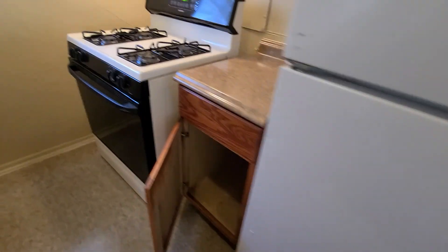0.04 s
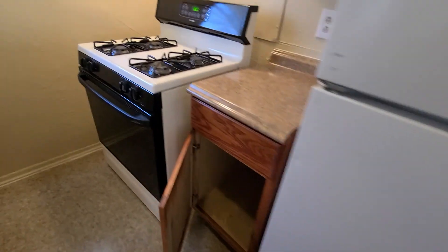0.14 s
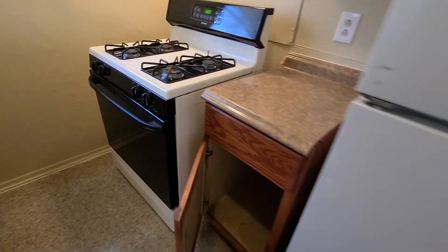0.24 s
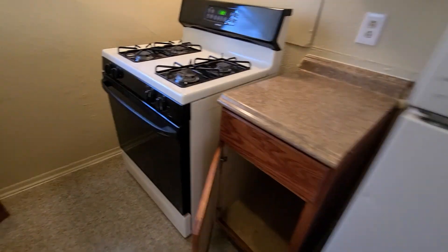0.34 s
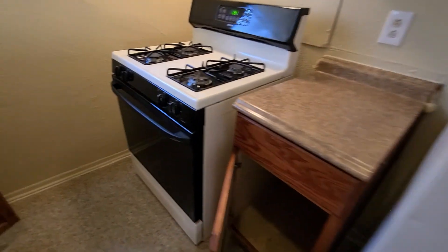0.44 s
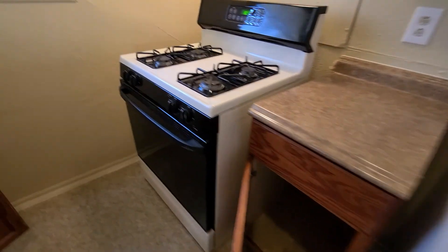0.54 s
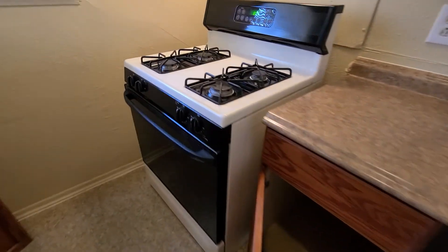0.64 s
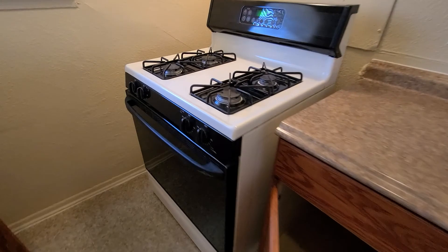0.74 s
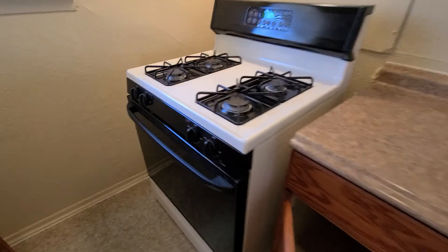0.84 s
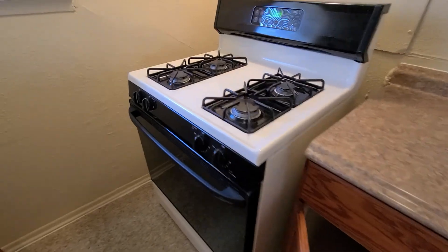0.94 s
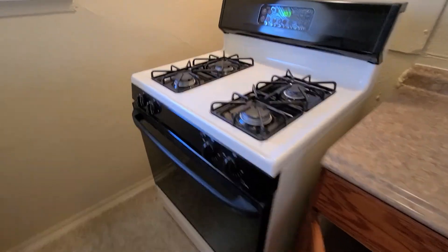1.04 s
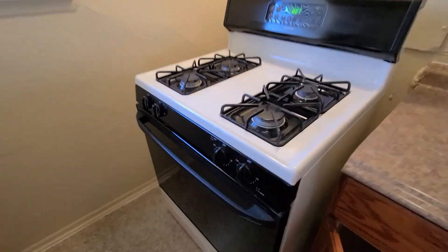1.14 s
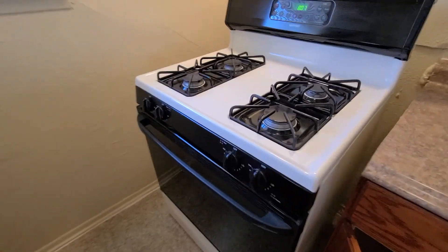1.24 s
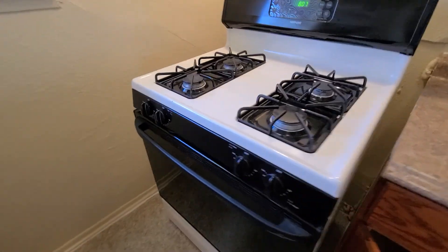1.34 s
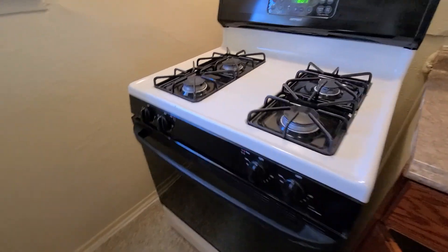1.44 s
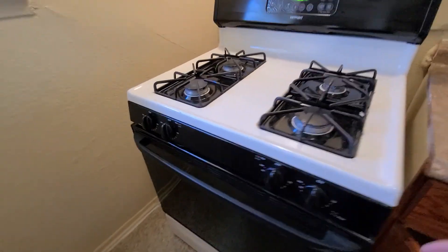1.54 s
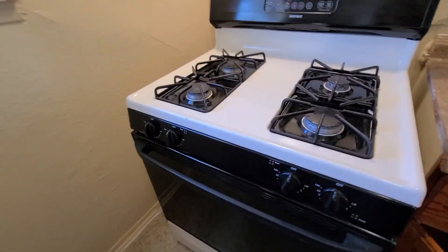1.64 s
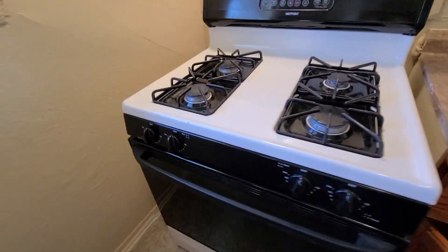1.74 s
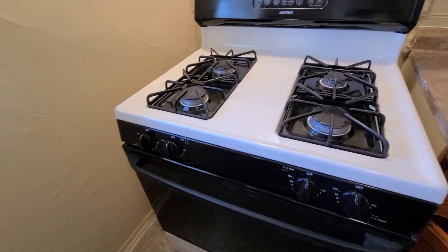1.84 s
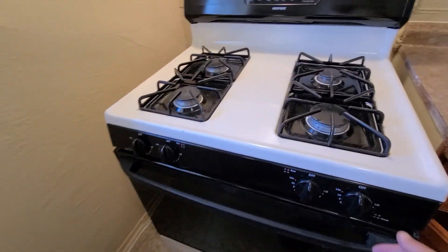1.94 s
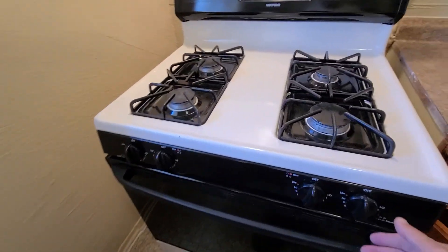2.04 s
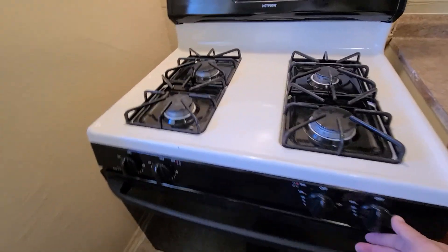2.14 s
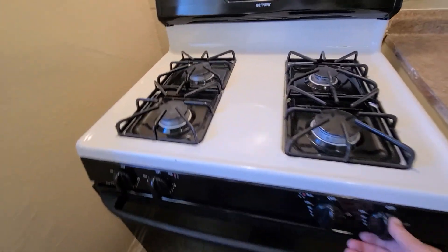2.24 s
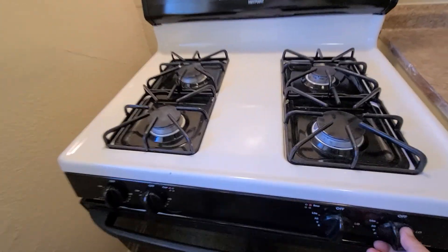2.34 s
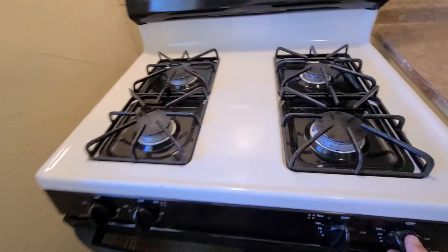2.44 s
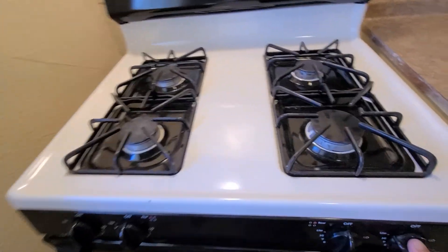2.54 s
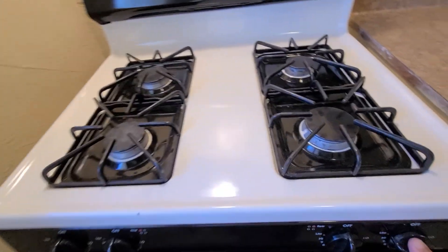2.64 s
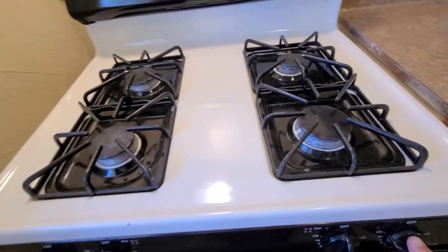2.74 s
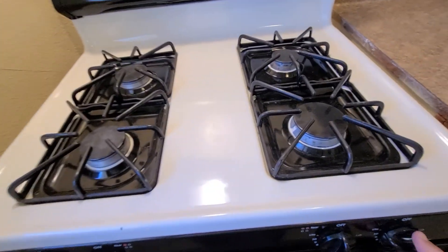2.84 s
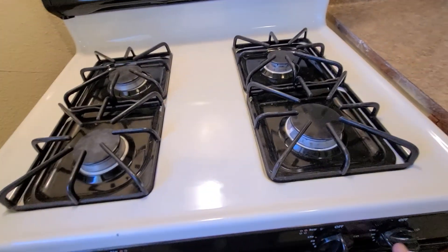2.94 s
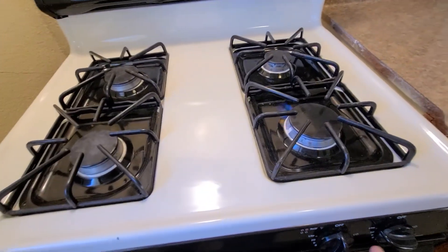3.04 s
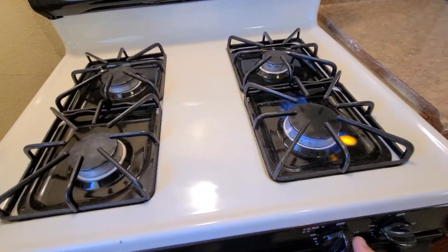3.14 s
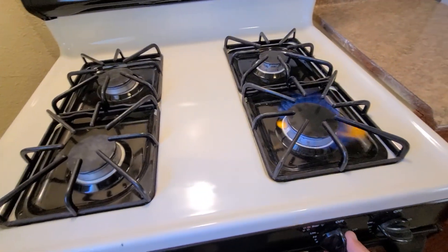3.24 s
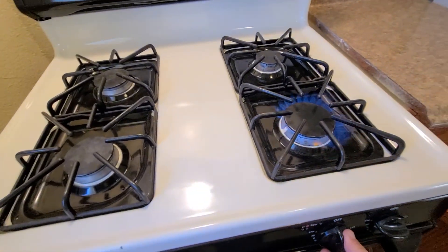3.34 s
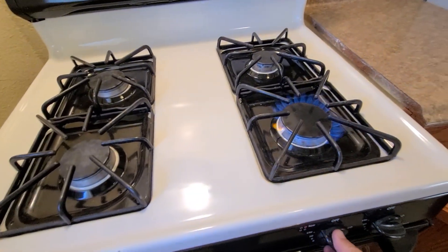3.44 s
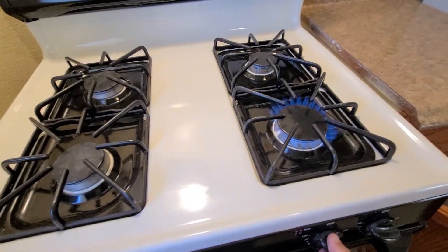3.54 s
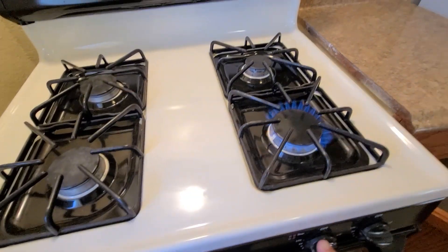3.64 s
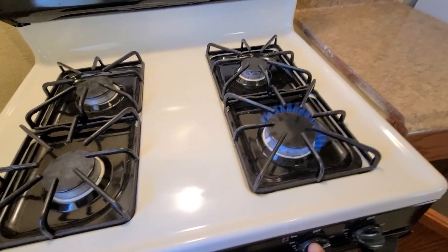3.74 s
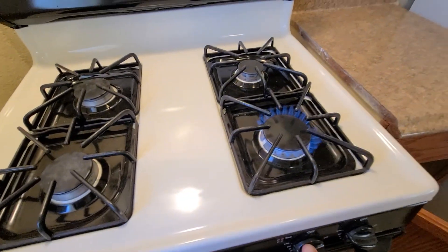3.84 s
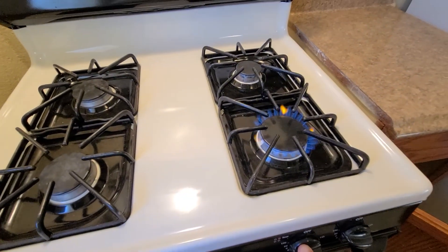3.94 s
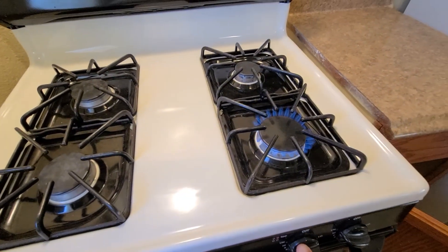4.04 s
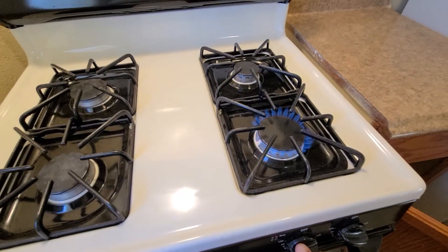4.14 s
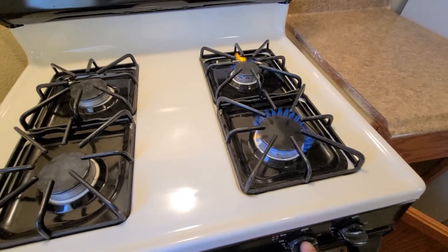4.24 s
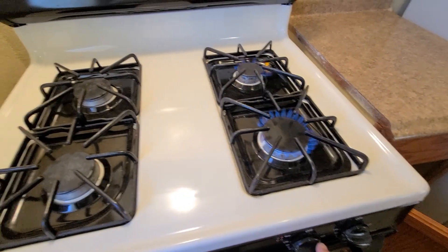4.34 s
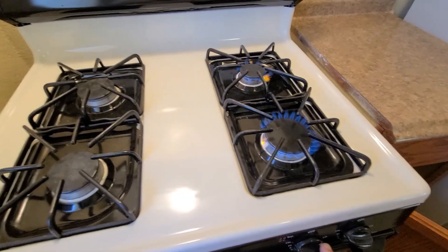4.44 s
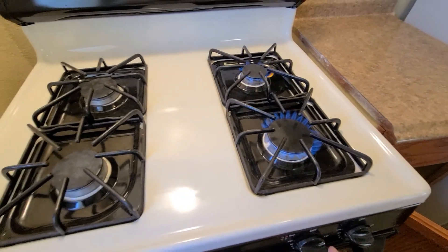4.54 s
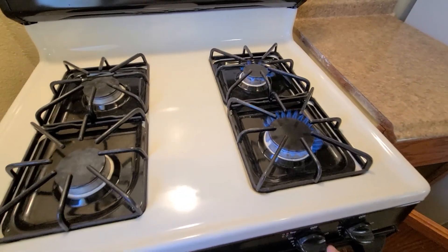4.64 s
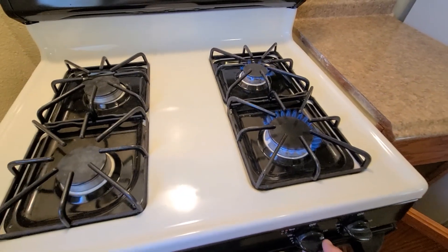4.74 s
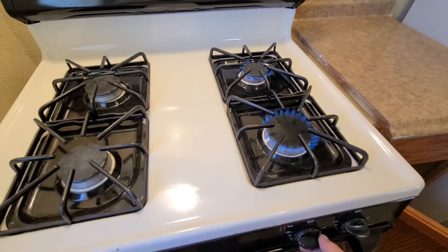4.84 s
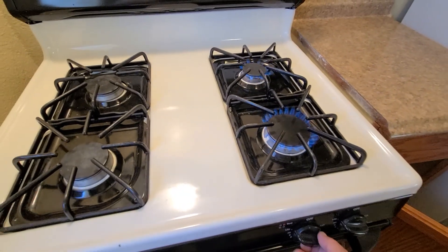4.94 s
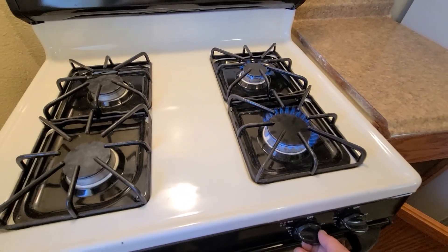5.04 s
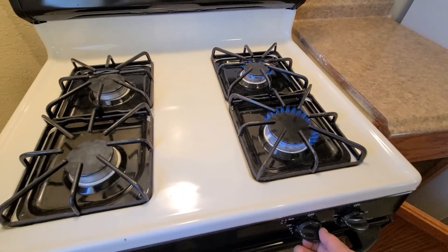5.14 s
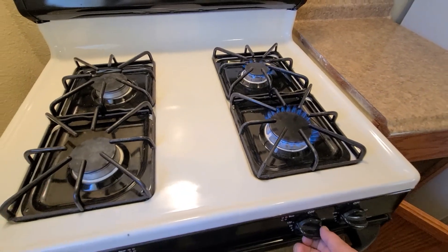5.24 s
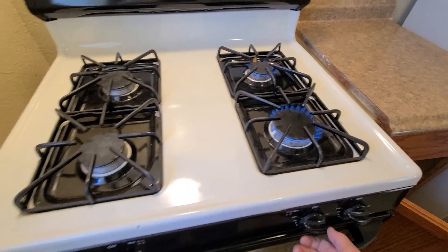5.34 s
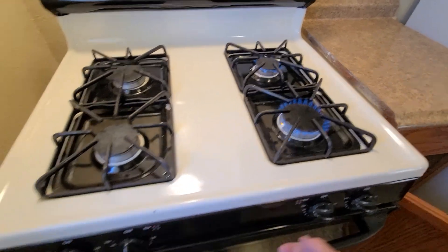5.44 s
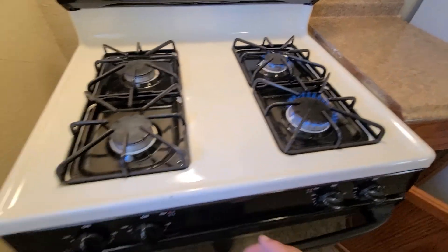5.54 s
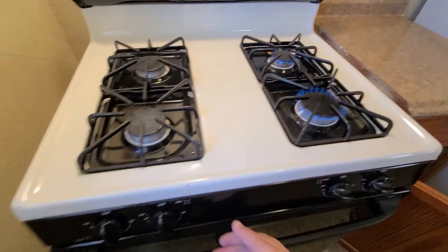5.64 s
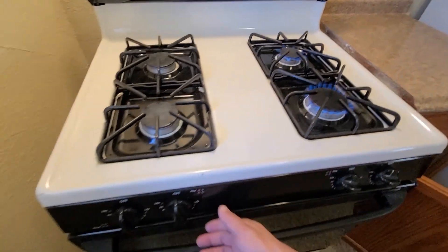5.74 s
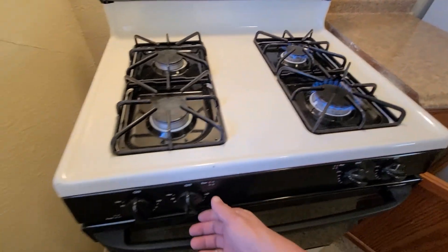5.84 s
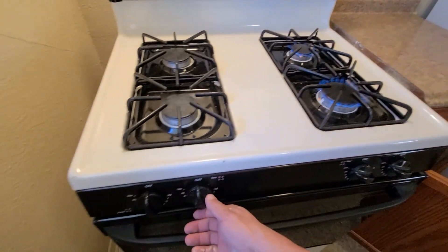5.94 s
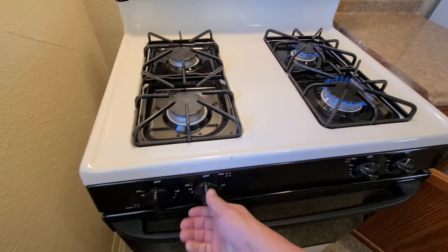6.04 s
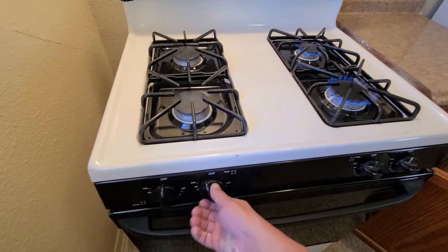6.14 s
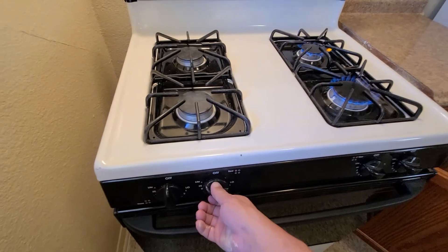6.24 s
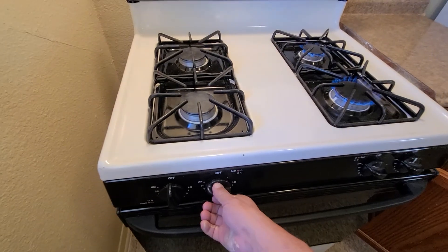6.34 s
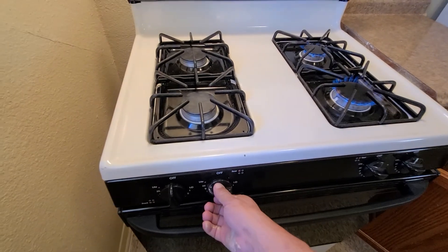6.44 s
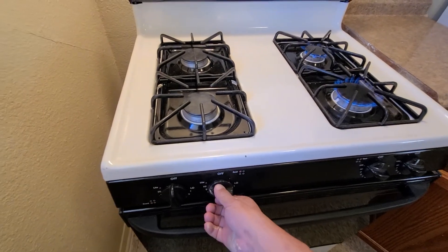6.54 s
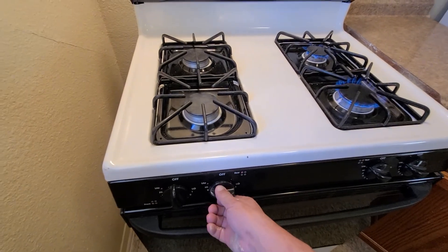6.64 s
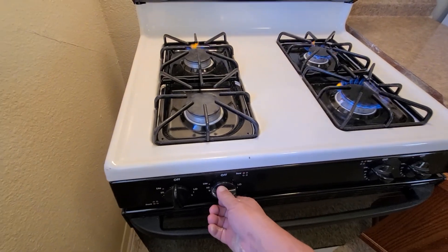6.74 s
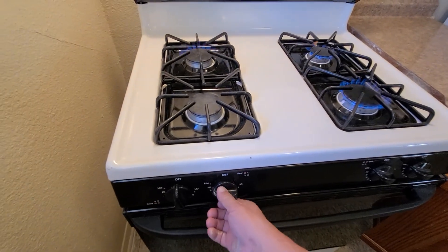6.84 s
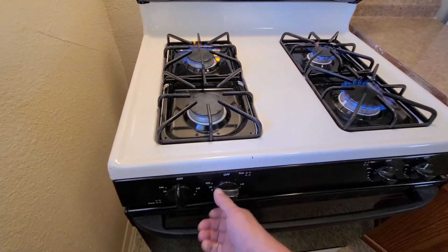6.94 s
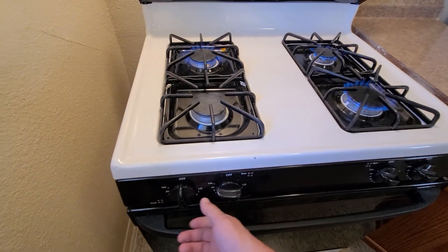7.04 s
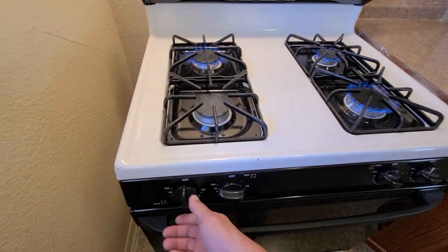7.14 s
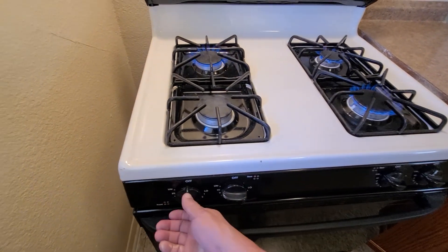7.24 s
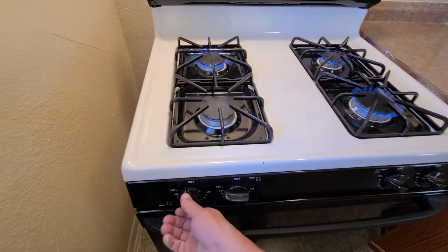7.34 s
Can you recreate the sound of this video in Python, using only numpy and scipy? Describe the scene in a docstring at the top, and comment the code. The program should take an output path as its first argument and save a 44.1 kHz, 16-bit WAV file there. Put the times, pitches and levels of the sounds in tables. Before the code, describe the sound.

Soft handling rustles and a low motor hum, then a hard knob clack and bright, evenly spaced gas-stove sparks ringing off the grates.

```python
"""Lighting a gas range

A gas range is lit in a small kitchen, heard from a hand-held stereo microphone that is carried up to it.
Knobs clack as decaying modes; the igniter snaps four times a second, and noise tails ring kitchen and grates.
Shaped noise makes the gas hiss, the burner puffs, the room's rush and, early on, fingers and sleeve.
Wavering sines make the hum of a motor and the mains."""
import sys
import numpy as np
from scipy import signal
from scipy.fft import rfft, irfft
from scipy.io import wavfile
from scipy.ndimage import map_coordinates

SR = 44100
rng = np.random.default_rng(int(sys.argv[2]) if len(sys.argv) > 2 else 0)


def wrap_up_sound(samples):
    """Save the sound to the file named by the first command line argument, as 16-bit audio."""
    columns = np.atleast_2d(samples).T
    # keep every value between -1 and 1, then stretch to whole-number steps
    tamed = np.clip(columns, -1, 1)
    steps = np.round(tamed * 32767).astype(np.int16)
    wavfile.write(sys.argv[1], SR, steps)


N = 325899
TIME = np.arange(N) / SR
LEFT_RIGHT = np.array([[.5], [-.5]])   # splits a left-minus-right difference over the two ports
PORT_SPACING_M, SOUND_SPEED_M_S = 0.18, 343
CUTOFF_HZ = 15750

# The room's rush, its colour: (frequency [Hz], relative density [dB])
RUSH_COLOUR = [(20, -3.5), (45, -3), (75, 3.5), (135, -9), (210, 0.5), (290, -5), (390, -0.5), (600, -8),
               (820, -9), (1050, -15.5), (1500, -13.5), (2300, -22), (5000, -32), (7500, -42.5),
               (9000, -46.5), (15500, -56.5)]
# Stereo balance of the rush: (frequency [Hz], left minus right [dB])
RUSH_BALANCE = [(60, -4), (700, -0.5), (1300, 4), (3000, 0), (4400, 2), (6000, 13.5), (8000, 9),
                (11000, -1), (15000, 15)]
# The rush over time: (time [s], relative level [dB])
RUSH_LEVEL = [(0.0, -40.5), (0.51, -42.5), (2.28, -40.5), (2.57, -42.5), (4.69, -45.5), (4.92, -45),
              (7.39, -44.5)]

MOTOR_HZ, MAINS_HZ = 91.15, 240.3
# The motor's note, carried through the room's standing waves: (time [s], relative level [dB])
MOTOR_LEVEL = [(0.0, -36), (0.57, -34.5), (2.05, -35.5), (2.62, -31.5), (2.68, -33), (5.0, -34),
               (6.44, -38), (7.3, -37.5)]
# The mains hum, loudest beside the stove: (time [s], level before waver [dB])
MAINS_LEVEL = [(0, -64), (1.5, -48), (2.4, -46.5), (3.4, -51), (4.2, -47.5), (5.2, -48), (6.3, -59)]
# Weaker steady tones of mains and motor: (frequency [Hz], level before waver [dB])
WEAK_TONES = [(59.3, -47), (119, -57), (297, -55.5), (362, -55), (865.5, -60), (1221, -62)]

# A sleeve swishes as the arm swings: (peak time [s], level [dB], attack [s], release [s])
SLEEVE_STROKES = [(.97, -42.5, 0.54, 0.14)]
# Colour of the sleeve: (frequency [Hz], relative density [dB])
SLEEVE_COLOUR = [(500, -7), (1200, 0), (1800, 3.5), (2600, -3.5), (4500, -15.5), (8000, -37)]
# A fingertip brushes over the left port: (peak time [s], level [dB], attack [s], release [s])
BRUSH_STROKES = [(.607, -36, .004, 0.053), (.733, -34, 0.028, 0.041), (.868, -35, .03, 0.016)]
# Colour of the brushes: (frequency [Hz], relative density [dB])
BRUSH_COLOUR = [(500, 2), (1800, -1), (3500, -6.5), (5000, -5.5), (6500, -2), (8000, -10.5), (9500, -18.5),
                (12500, -24), (15500, -35)]
# A finger slips on the case near the right port: (peak time [s], level [dB], attack [s], release [s])
SLIP_STROKES = [(1.041, -23.5, .019, .02)]
# Colour of the slip: (frequency [Hz], relative density [dB])
SLIP_COLOUR = [(400, 5.5), (1200, -3), (2600, 4.5), (3600, 2), (5000, -14), (8000, -23.5), (11500, -23),
               (15000, -38)]

# Puff of the big front burner as it catches: (frequency [Hz], relative density [dB])
FRONT_PUFF = [(22, -18), (43, -1), (80, -3), (160, -9.5), (350, -18), (2000, -51)]
# Puff of the small rear burner as it catches: (frequency [Hz], relative density [dB])
REAR_PUFF = [(400, -15), (900, -11), (1300, 7), (1700, -13), (4000, -30)]

# Knobs clack as they are pushed in and let go: (time [s], relative level [dB], contact brightness [Hz])
KNOB_HITS = [(2.215, -27.5, 9000), (2.2328, -13.5, 5550), (2.24, -18, 3500), (2.31, -24.5, 2400),
             (6.1009, -27.5, 9000), (6.110, -19, 750), (6.802, -34.5, 7000)]
# Knob, valve stem and front panel: (nominal frequency [Hz], nominal strength [dB], t60 [s])
KNOB_MODES = [(450, -4.5, 0.024), (706, -7, 0.044), (1155, -10.5, 0.028), (1439, -6, 0.077),
              (1570, -6, .025), (2020, -8, 0.014), (2690, -4, 0.02), (2840, 1.5, 0.013), (3143, 1.5, 0.017),
              (3550, -6, .01), (4500, 0, .007), (4890, -2.5, 0.0087), (6300, -18, .007)]

# Spectrum of the snap: (frequency [Hz], relative density [dB])
SNAP_COLOUR = [(500, -60), (1050, -32.5), (1350, -13), (2250, -16.5), (3000, -11), (4600, -9), (5600, -7.5),
               (6800, -7.5), (7700, -2), (9300, -1.5), (11000, -5.5), (13500, -14), (15500, -12)]
# Resonant peaks that colour each snap: (frequency [Hz], width [Hz], boost [dB])
SNAP_PEAKS = [(1560, 210, 8), (3060, 160, 1.5), (3300, 120, 6), (6100, 140, 6), (7900, 150, 3),
              (8930, 430, 2.5)]
# The kitchen's answer to a spark: (frequency [Hz], gain on top of the snap's spectrum [dB])
WALLS = [(1400, -1.5), (3000, 2), (4500, -3), (8000, 0), (15000, -3)]
# The ring left in the grates: (frequency [Hz], relative density [dB])
GRATES_COLOUR = [(2000, -12.5), (3000, -12), (4500, -8.5), (6500, -5), (7800, -2), (9500, -5),
                 (11500, -17.5), (15000, -35.5)]
# The two ports hear the sparks' treble differently: (frequency [Hz], left minus right [dB])
PORT_BALANCE = [(1400, 1.5), (2000, 3), (3000, -1), (4000, 0.5), (5500, 11), (7000, 14.5), (8500, 1),
                (11000, -0.5), (13000, 3.5), (15000, 1.5)]
# Sparks as the microphone moves: (time [s], relative level [dB], left minus right before centring [dB])
SPARK_AIM = [(2.8, -16.5, -0.5), (4.2, -15.5, 8), (5.1, -17, 14.5), (5.4, -17, 0.5), (6.5, -15.5, 8.5),
             (7.2, -16, 3)]
KITCHEN_T60_S, GRATE_T60_S = 0.24, 1
FIRST_SPARK_S, SPARK_PERIOD_S, SPARK_UNEVEN_DB = 2.65875, .25008, 0.53


def from_db(db):
    """Decibels to gain."""
    return 10 ** (np.asarray(db) / 20)


def rms_one(x):
    """Scale to an rms of 1."""
    return x / np.sqrt(np.mean(x ** 2) + 1e-20)


def unit_energy(x):
    """Scale each channel to an energy of 1."""
    return x / np.sqrt(np.sum(x ** 2, axis=-1, keepdims=True) + 1e-20)


def in_time(rows):
    """A (time, value) curve at every sample."""
    return np.interp(TIME, *np.transpose(rows))


def colour(x, points, share=1):
    """Causal (minimum-phase) filter that follows a share of the (Hz, dB) points."""
    size = 8192
    hz, db = np.transpose(points)
    bins_hz = np.arange(size // 2 + 1) * SR / size
    wanted_db = share * np.interp(np.log(bins_hz + 1), np.log(hz), db)
    # folding the cepstrum onto positive time gives minimum phase
    cepstrum = irfft(np.log(from_db(wanted_db)))
    cepstrum[..., 1:size // 2] *= 2
    cepstrum[..., size // 2 + 1:] = 0
    response = irfft(np.exp(rfft(cepstrum)))[..., :size // 2]
    return signal.fftconvolve(np.atleast_2d(x), np.atleast_2d(response), axes=-1)[:, :x.shape[-1]]


def drift(rate):
    """Smooth random wander of spread about 1, through `rate` random knots a second."""
    knots = rng.standard_normal(2048)
    step = 64   # samples for which each value is held
    places = np.arange(0, N, step) / SR * rate
    return map_coordinates(knots, [places], mode="wrap").repeat(step)[:N]


def dying_noise(t60):
    """Stereo noise that builds up in a few milliseconds and dies away; energy 1."""
    t = TIME[:int(.7 * SR)]
    envelope = from_db(-60 * t / t60) * (1 - np.exp(-t / .0018))
    return unit_energy(rng.standard_normal((2, len(t))) * envelope)


def add(out, s, sound):
    """Mix a sound in at time s."""
    start = round(s * SR)
    out[:, start:start + sound.shape[1]] += sound[:, :N - start]


def rush(gain_db=4.5):
    """Diffuse air noise: the two ports hear alike only those waves that are longer than their spacing."""
    hz = np.arange(N // 2 + 1) * SR / N
    alike = .98 * np.sinc(2 * hz * PORT_SPACING_M / SOUND_SPEED_M_S)
    mid, side = rfft(rng.standard_normal((2, N)))
    air = irfft(np.sqrt(1 + alike) * mid + 2 * LEFT_RIGHT * np.sqrt(1 - alike) * side, N)
    air = colour(colour(air, RUSH_COLOUR), RUSH_BALANCE, LEFT_RIGHT)
    return from_db(in_time(RUSH_LEVEL) + gain_db) * rms_one(air)


def tone(hz, db, wander_rad):
    """A steady tone whose phase wanders as the microphone moves; short waves differ more between the ports."""
    between_ports = 2 * np.pi * hz * PORT_SPACING_M / SOUND_SPEED_M_S * drift(1) / 2
    phase = 2 * np.pi * hz * TIME + wander_rad * drift(4) + LEFT_RIGHT * between_ports
    return np.sqrt(2) * from_db(db) * np.sin(phase)


def hum(motor_db=-0.04, waver_db=0.5, mains_waver_db=2.2, pan_db=-0.7):
    """A motor's deep note, the mains hum and weaker tones, wavering in the room's standing waves."""
    motor_level = motor_db + in_time(MOTOR_LEVEL) + waver_db * drift(7)
    motor = tone(MOTOR_HZ, motor_level, wander_rad=0.23) * from_db(LEFT_RIGHT * pan_db)
    mains_level = in_time(MAINS_LEVEL) + mains_waver_db * drift(7.6)
    mains = tone(MAINS_HZ, mains_level, wander_rad=0.71)
    weak = sum(tone(hz, db + 2 * drift(7), wander_rad=.3 + hz / 1200) for hz, db in WEAK_TONES)
    return motor + mains + weak


def swell(strokes, roundness=1.7):
    """Gain of rubbing strokes: each rises to its peak and falls away."""
    gain = 0
    for s, db, attack_s, release_s in strokes:
        length_s = np.where(TIME < s, attack_s, release_s)
        gain = gain + from_db(db) * np.exp(-np.abs((TIME - s) / length_s) ** roundness)
    return gain


def rub(strokes, spectrum, pan_db, grain_db):
    """Skin or cloth rubbing: dense tiny slips of uneven size, heard mostly by the nearer port."""
    slips = rng.standard_normal((2, N)) * from_db(grain_db * drift(550))
    near = from_db(LEFT_RIGHT * pan_db - abs(pan_db) / 2)   # the nearer port keeps full level
    return swell(strokes) * near * rms_one(colour(slips, spectrum))


def sleeve():
    """Cloth rubs in one long, soft swish."""
    return rub(SLEEVE_STROKES, SLEEVE_COLOUR, pan_db=-3.0, grain_db=0.5)


def fingers():
    """Skin brushes the left port, then slips on the case near the right one."""
    brushes = rub(BRUSH_STROKES, BRUSH_COLOUR, pan_db=34.0, grain_db=2.0)
    slip = rub(SLIP_STROKES, SLIP_COLOUR, pan_db=-26.0, grain_db=2.5)
    return brushes + slip


def gas(level_db=-56.5, surge_db=8.0, surge_s=0.2, jet_hz=3050, width_hz=700):
    """Gas rushes through the burner's jet as the valve opens, then settles to a faint hiss."""
    open_s, rise_s = 2.28, .02
    jet = signal.lfilter(*signal.iirpeak(jet_hz, jet_hz / width_hz, fs=SR), rng.standard_normal((2, N)))
    jet = colour(jet, [(3500, -14.5), (7000, -22)])
    age = np.maximum(TIME - open_s, 0)
    level = from_db(level_db + surge_db * np.exp(-age / surge_s))
    return level * np.minimum(age / rise_s, 1) * rms_one(jet)


def ignition(spectrum, at_s, length_s, level_db, flutter_db):
    """A burner catches: the flame gives a soft, fluttering puff of coloured noise."""
    flutter = from_db(flutter_db * drift(70))
    puff = rms_one(colour(rng.standard_normal(N) * flutter, spectrum))
    return from_db(level_db) * puff * np.exp(-((TIME - at_s) / length_s) ** 2)


def rattle(at_s=3.419, gap_s=.012, peak_db=-18.5, peak_share=0.39, fade_db=30.0,
           first_hz=3500, last_hz=1400, count=6):
    """A turning knob chatters on its stem, swelling, fading and growing duller: rows like KNOB_HITS."""
    turned = np.linspace(0, 1, count)
    db = peak_db - fade_db * (turned - peak_share) ** 2
    return list(zip(at_s + gap_s * np.arange(count), db, np.geomspace(first_hz, last_hz, count)))


def knobs(crack_db=-3.0, crack_s=0.0016, direct_db=-6.5, room_db=-5.0, t60=0.28, detune=0.039):
    """Each contact is a short crack that rings the panel; it has its own brightness, and the grip bends the modes."""
    out, t = np.zeros((2, N)), TIME[:SR // 4]
    hz, mode_db, mode_t60 = np.transpose(KNOB_MODES)[:, :, None]
    for s, db, bright_hz in KNOB_HITS + rattle():
        uneven, bend, side = rng.standard_normal((3, *hz.shape))
        strength = from_db(mode_db + 2 * uneven) * np.sign(side)
        bent_hz = hz * (1 + detune * bend)
        modes = strength * from_db(-60 * t / mode_t60) * np.sin(2 * np.pi * bent_hz * t)
        ring = np.sum(modes, axis=0)
        crack = from_db(crack_db) * rng.standard_normal(len(t)) * np.exp(-t / crack_s)
        contact = signal.butter(2, min(bright_hz, CUTOFF_HZ), fs=SR, output="sos")
        clack = from_db(db) * signal.sosfilt(contact, ring + crack)[None]
        add(out, s, from_db(direct_db) * clack)
        add(out, s, from_db(room_db) * signal.fftconvolve(clack, dying_noise(t60), axes=-1))
    return out


def snap(size, scatter=0.46, path_s=.00014, path_ratio=2.3, rebound_db=-5, wall_db=-24.0, wall_s=.0082):
    """One spark: a pressure spike, its scatter off burner cap and grate, and an echo off the back panel; energy 1."""
    pulses = np.zeros((2, size))
    for port in pulses:
        port[0] = 1
        for lag_s in path_s * path_ratio ** np.arange(3) * (1 + .2 * rng.uniform(-1, 1, 3)):
            # all-pass: spreads the spike, keeps its colour
            loop = np.r_[1, np.zeros(int(lag_s * SR)), -scatter]
            port[:] = signal.lfilter(loop[::-1], loop, port + 1e-18)
        port[rng.integers(2, 9)] -= from_db(rebound_db)   # opposite spike a few samples later
        lag = int(wall_s * SR * rng.uniform(.9, 1.1))
        port[lag:] += from_db(wall_db) * port[:-lag]
    for hz, width_hz, boost_db in SNAP_PEAKS:
        peak = signal.lfilter(*signal.iirpeak(hz, hz / width_hz, fs=SR), pulses)
        pulses = pulses + (from_db(boost_db) - 1) * peak
    return unit_energy(colour(pulses, SNAP_COLOUR))


def sparks():
    """A steady timer's sparks, slightly uneven in strength: rows like SPARK_AIM."""
    s = np.arange(FIRST_SPARK_S, N / SR, SPARK_PERIOD_S)
    aim_s, db, pan_db = np.transpose(SPARK_AIM)
    uneven_db = SPARK_UNEVEN_DB * rng.standard_normal(len(s))
    return zip(s, np.interp(s, aim_s, db) + uneven_db, np.interp(s, aim_s, pan_db))


def igniter(room_db=0.0, grate_db=-10.5, level_db=1.5, centre_db=6.0):
    """No two sparks take the same path, so each wakes kitchen and grates a little differently, as fresh noise."""
    out = np.zeros((2, N))
    snap_samples = .004 * SR   # turns unit energy into the level over 4 ms
    for s, db, pan_db in sparks():
        kitchen = unit_energy(colour(colour(dying_noise(KITCHEN_T60_S), SNAP_COLOUR), WALLS))
        grates = unit_energy(colour(dying_noise(GRATE_T60_S), GRATES_COLOUR))
        direct = snap(kitchen.shape[1]) * from_db(LEFT_RIGHT * (pan_db - centre_db))
        tail = from_db(room_db) * kitchen + from_db(grate_db) * grates
        add(out, s, from_db(db + level_db) * np.sqrt(snap_samples) * (direct + tail))
    return colour(out, PORT_BALANCE, LEFT_RIGHT)


def scene():
    """Room, hand and stove together."""
    room = rush() + hum()
    hand = sleeve() + fingers()
    front = ignition(FRONT_PUFF, at_s=3.2, length_s=0.16, level_db=-38.0, flutter_db=3.0)
    rear = ignition(REAR_PUFF, at_s=4.28, length_s=0.078, level_db=-48.5, flutter_db=6.0)
    stove = gas() + front + rear + knobs() + igniter()
    return room + hand + stove


def record(dry):
    """The sharpest peaks are rounded, the top is cut."""
    top = .95
    cut = signal.ellip(10, .2, 80, CUTOFF_HZ, fs=SR, output="sos")
    return signal.sosfilt(cut, top * np.tanh(dry / top))


dry = scene()
out = record(dry)
wrap_up_sound(out)
```